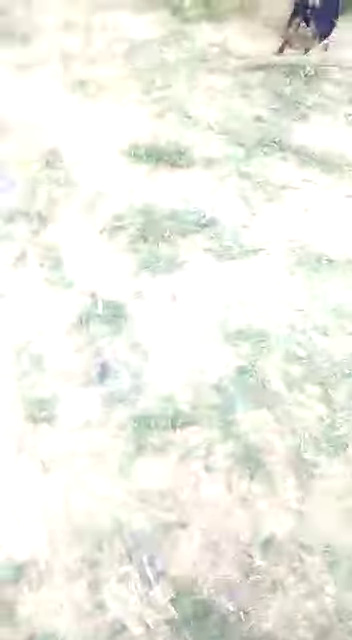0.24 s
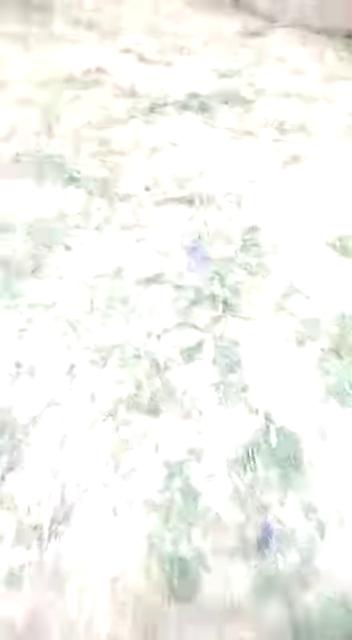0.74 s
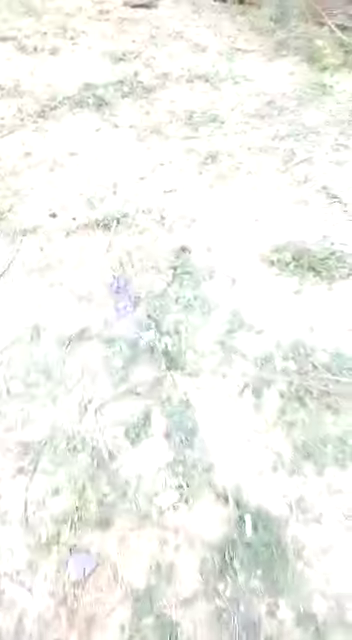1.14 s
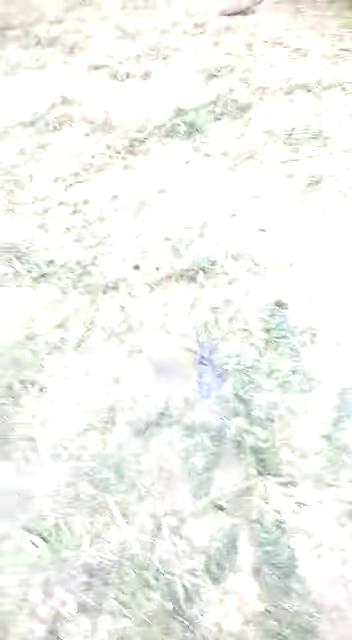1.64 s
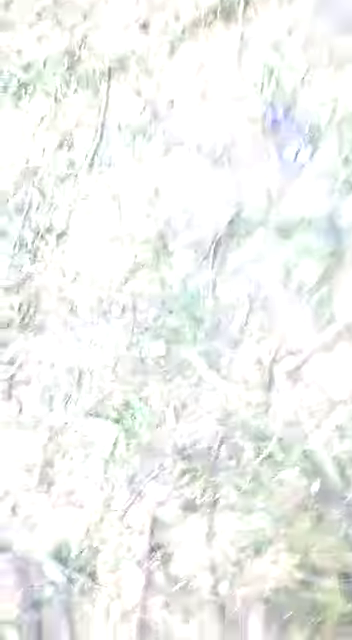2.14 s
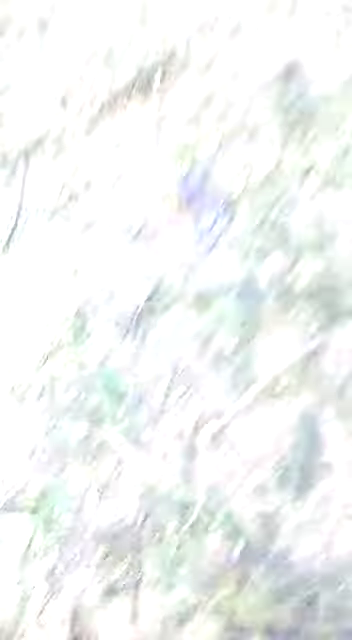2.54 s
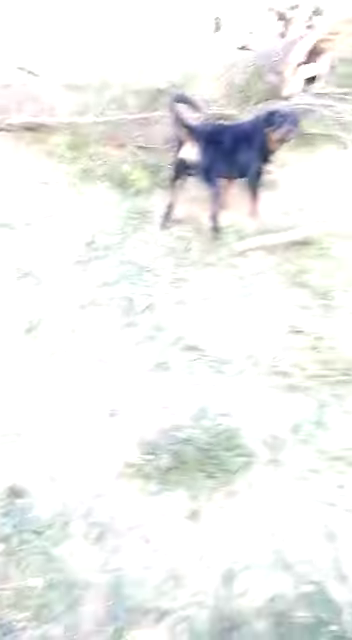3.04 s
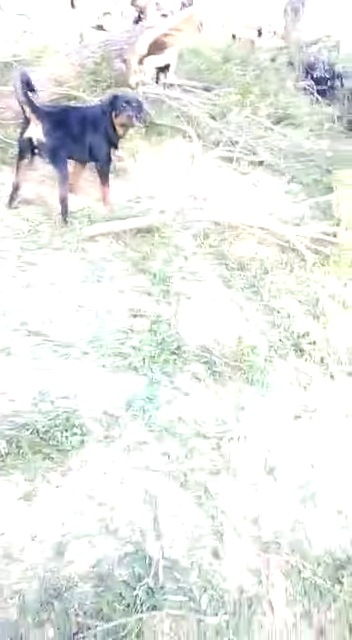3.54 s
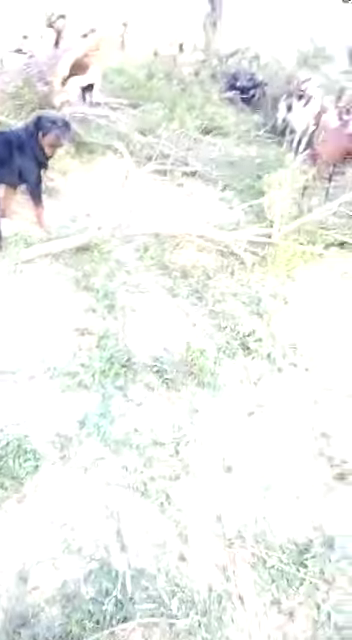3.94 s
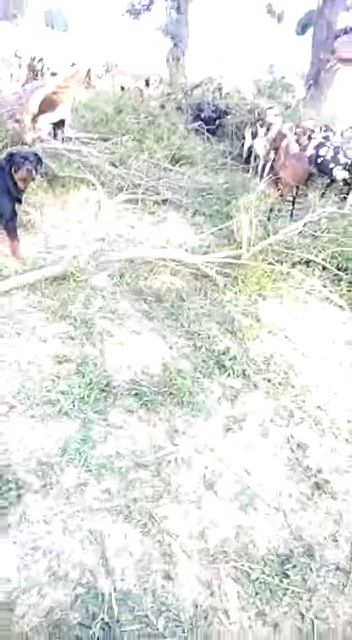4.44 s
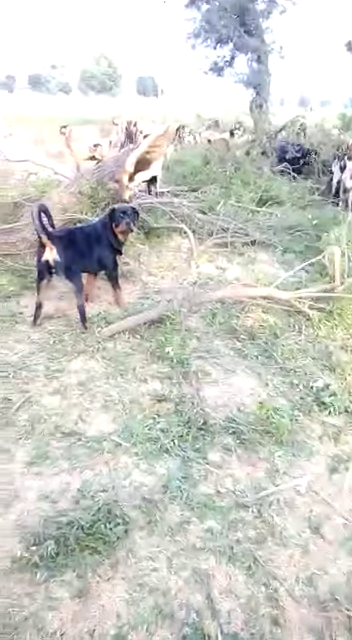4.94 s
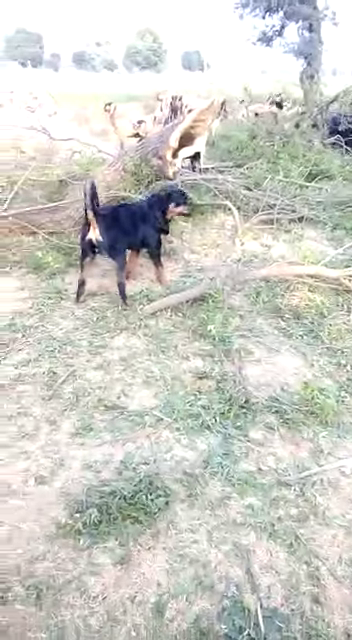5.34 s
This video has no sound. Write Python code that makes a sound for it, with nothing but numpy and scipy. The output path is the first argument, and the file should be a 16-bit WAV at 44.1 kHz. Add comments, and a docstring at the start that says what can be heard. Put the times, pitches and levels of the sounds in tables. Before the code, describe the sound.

Dry brush rustles and twigs snap while a small herd bell clanks quickly, tiny bells tinkle, birds chirp, and bumps knock the handheld microphone.

```python
"""A hand-held camera with two sound ports in a field among a browsing herd, heard in order of time.
From the start brush rustles (patchy noise), wind buffets, small bells ping amid ticks and rattles, and far bells
blend into an unsteady hum (sines). Then twigs snap and feet thud (noise bursts), wind and fingers bump the camera,
mostly on the left port (low pulses), birds whistle and chirp (gliding partials with echoes), the near bell clanks
(decaying modes). Late on, a faint far drone (a sine) grows and fades; a dull flutter (noise) comes and goes, rising at the end."""
import sys
import numpy as np
from scipy import signal
from scipy.fft import rfft, irfft, next_fast_len
from scipy.io import wavfile
from scipy.ndimage import uniform_filter1d, map_coordinates

SR = 44100
rng = np.random.default_rng(int(sys.argv[2]) if len(sys.argv) > 2 else 0)


def pcm_store(signal):
    """Save signal as 16-bit PCM."""
    levels = np.round(np.clip(np.atleast_2d(signal), -1, 1) * 32767)
    wavfile.write(sys.argv[1], SR, levels.astype(np.int16).T)


N = 246078
T = np.arange(N) / SR
LAG = 11  # samples by which the herd reaches the left port later


def amp(db):
    """Decibel law: the amplitude ratio of a level in dB."""
    return np.exp(np.asarray(db) * (np.log(10) / 20))


def unit(x):
    """Power normalisation: the signal scaled to rms 1."""
    return x / np.sqrt(np.mean(x ** 2) + 1e-20)


def sides(pan_db):
    """Level difference between ports: left and right gains, where positive dB means louder on the left."""
    left = 1 / (1 + amp(-np.asarray(pan_db)))
    return 2 * np.array([left, 1 - left])


def curves(rows):
    """Linear interpolation: one value per sample for each column after the time."""
    s, *columns = np.transpose(rows)
    return [np.interp(T, s, column) for column in columns]


def wobble(rate):
    """Band-limited random modulation: a smooth curve through `rate` random knots a second."""
    knots = rng.standard_normal(int(N * rate / SR) + 4)
    return map_coordinates(knots, [T * rate])


def coloured(x, points):
    """Linear filtering: x shaped by a spectrum of (Hz, dB) points, then set to rms 1."""
    n = x.shape[-1]
    m = next_fast_len(n + 4096)
    hz, db = np.transpose(points)
    log_hz = np.log(np.fft.rfftfreq(m, 1 / SR) + 1)
    gain = amp(np.interp(log_hz, np.log(hz + 1), db, -120, -120))
    return unit(irfft(rfft(x, m) * gain, m)[..., :n])


def add(out, s, x, pan_db, lag=0):
    """Superposition: adds one sound at its time and side, reaching the left port `lag` samples later."""
    for ch, (gain, late) in enumerate(zip(sides(pan_db), (lag, 0))):
        part = out[ch, round(s * SR) + late:][:len(x)]
        part += gain * x[:len(part)]


def rush(spectrum, alike, patchy_db, grain_db):
    """Partly coherent stereo noise: grainy in time and patchy in frequency, with dips deeper than peaks."""
    shared = rng.standard_normal(N + 64)
    own = rng.standard_normal((2, N))
    shared_at_ports = np.array([shared[64 - LAG:][:N], shared[64:]])
    noise = np.sqrt(alike) * shared_at_ports + np.sqrt(1 - alike) * own
    grains = amp(grain_db * wobble(300))
    z = signal.stft(grains * noise, nperseg=512)[2]
    # one field of patches for both ports, smooth over 3 frequency bins and 16 time frames
    field = rng.standard_normal(z.shape[1:])
    field = unit(uniform_filter1d(uniform_filter1d(field, size=3, axis=0), size=16, axis=1))
    patches = np.where(field < 0, field, np.tanh(field))
    patchy = signal.istft(z * amp(patchy_db * patches), nperseg=512)[1][:, :N]
    return coloured(patchy, spectrum)


SWELL_DB = 10.5  # how far a swish or gust has dropped at its two ends


def swells(s, length, gain):
    """Addition of powers: events that swell and die around their loudest moment, one curve per row of gain."""
    t = T[::64]
    from_peak = np.abs(2 * (t - s[:, None]) / length[:, None])
    shape = amp(-SWELL_DB * from_peak ** 1.6)
    return np.array([np.interp(T, t, power) for power in gain ** 2 @ shape ** 2])


# steady rustling of the brush: time_s, rustle_db, crisp_treble_db, airy_top_db, dull_scuffing_db
BRUSH_LEVELS = [(0.0, -54.5, -45.5, -60, -58.5), (0.43, -69, -64, -72, -60), (0.87, -60.5, -57, -69, -73.5),
                (1.29, -76, -48, -45, -83), (1.82, -51.5, -68, -66, -63.5), (2.11, -49, -56.5, -56, -57),
                (2.42, -55, -52, -62, -73.5), (2.84, -55.5, -57, -67, -63), (3.12, -75, -65.5, -69, -80.5),
                (3.56, -58.5, -46, -60, -95), (3.85, -52.5, -66.5, -82.5, -85.5),
                (4.49, -63, -58, -96, -82), (5.35, -64, -61.5, -77, -87), (5.58, -45.5, -50, -65, -54)]
# swishes through the brush: loudest_s, length_s, rustle_db, crisp_db, airy_db, scuffing_db
BRUSH_SWISHES = [(0.337, 0.086, -57, -62, -59, -60.5), (0.53, 0.3, -54.5, -81, -84, -66),
                 (0.701, 0.037, -59, -47.5, -48.5, -86), (1.034, 0.19, -54.5, -54, -68, -56.5),
                 (1.11, 0.076, -70, -53, -50, -55.5), (1.262, 0.27, -43.5, -38.5, -59, -50.5),
                 (1.487, 0.14, -49.5, -49.5, -53, -58), (1.609, 0.15, -48, -42.5, -47.5, -57),
                 (2.014, 0.2, -51, -47.5, -56, -57), (2.21, 0.13, -48.5, -69, -60, -65),
                 (2.55, 0.2, -57.5, -49, -55.5, -91), (2.845, 0.098, -57.5, -52.5, -64.5, -71),
                 (3.033, 0.092, -62, -52.5, -54, -69.5), (3.234, 0.34, -51.5, -57.5, -69, -91),
                 (3.432, 0.14, -54, -51, -59, -59), (3.598, 0.19, -62, -52, -62, -74.5),
                 (3.997, 0.11, -48, -51, -87, -86), (4.229, 0.11, -45, -43.5, -79, -76),
                 (4.35, 0.28, -50.5, -61, -60, -89), (4.685, 0.2, -70, -59.5, -75, -75),
                 (4.936, 0.054, -48.5, -56, -79, -65), (4.99, 0.18, -46.5, -51, -77, -69),
                 (5.492, 0.071, -48.5, -69, -72, -75), (5.088, 0.14, -49.5, -50, -77, -60.5),
                 (0.85, 0.078, -70, -58, -70, -62), (1.867, 0.16, -61, -71, -68, -80),
                 (2.327, .08, -67, -61, -53, -63), (2.63, 0.092, -49, -58, -69, -60.5),
                 (3.742, 0.24, -48, -72.5, -69, -88), (4.852, 0.21, -73, -50, -80, -92),
                 (5.359, 0.045, -62, -48, -57, -92), (5.53, 0.08, -39, -42.5, -55, -49.5)]
# where the rustling is: time_s, left_right_db
BRUSH_PAN = [(0, -1), (.37, 1), (.5, -4), (1.3, 0), (2.2, 3), (2.83, 3), (2.95, 2.5), (3.2, 4), (3.8, 0.5),
             (4.4, 3), (5.4, 1), (5.52, 3)]
# relative spectral densities of the four bands: frequency_hz, density_db (per Hz)
RUSTLE_SPECTRUM = [(820, -56), (1400, -55), (1570, -5.5), (1730, -1), (1970, -0.5), (3470, 5.5), (5100, 0),
                   (6680, -7), (7000, -26), (9100, -52), (15400, -120)]
CRISP_SPECTRUM = [(3530, -15.5), (6000, -10.5), (6720, -8.5), (8030, -4.5), (8520, 0), (9140, -1),
                  (9960, 1), (11800, -4), (12500, -2.5), (16200, -44), (22000, -120)]
AIRY_SPECTRUM = [(10500, -27), (12000, -11.5), (13500, -7), (15000, -5), (16000, -38.5)]
SCUFF_SPECTRUM = [(180, -13), (300, 0), (386, -2), (690, -3), (882, -4.5), (1130, -5.5), (1600, -9.5),
                  (2080, -49), (3520, -120)]
AIRY_PAN_DB, SCUFF_PAN_DB = 2.5, 4.5  # the airy top lies further left; the scuffing stays put


def brush():
    """Friction noise: leaves, twigs and grass under hooves and feet give many tiny snaps, summed in four bands."""
    s, length, *peak_db = np.transpose(BRUSH_SWISHES)
    level = np.sqrt(amp(curves(BRUSH_LEVELS)) ** 2 + swells(s, length, amp(peak_db)))
    level = level * amp(2.1 * wobble(22))  # one movement shakes all the bands together
    rustle = level[0] * rush(RUSTLE_SPECTRUM, alike=0.19, patchy_db=9, grain_db=2)
    crisp = level[1] * rush(CRISP_SPECTRUM, alike=0.1, patchy_db=8, grain_db=2)
    airy = level[2] * rush(AIRY_SPECTRUM, alike=.3, patchy_db=7, grain_db=1.5)
    scuff = level[3] * rush(SCUFF_SPECTRUM, alike=.5, patchy_db=2, grain_db=2.5)
    pan_db, = curves(BRUSH_PAN)
    moving = sides(pan_db) * (rustle + crisp) + sides(pan_db + AIRY_PAN_DB) * airy
    return moving + sides([SCUFF_PAN_DB]) * scuff


# wind in the lulls between gusts: time_s, level_db
WIND_LULLS = [(0, -65), (.55, -76.5), (1.2, -89), (2.7, -72), (3.2, -93.5), (4.0, -81.5), (4.7, -78.5),
              (5.58, -87)]
# gusts on the ports: strongest_s, length_s, level_db, left_right_db
WIND_GUSTS = [(0.058, 0.034, -51, -14), (0.288, 0.27, -63.5, 17), (0.81, 0.12, -53.5, 36),
              (0.916, 0.043, -42, 47), (1.012, 0.083, -50.5, 13), (1.199, 0.2, -47.5, 9),
              (1.329, 0.098, -46.5, 10), (1.486, 0.17, -56.5, 32), (1.747, 0.23, -59.5, 38),
              (2.062, 0.16, -55.5, 19), (2.206, 0.17, -56.5, -4), (2.39, 0.17, -66, 22),
              (2.656, 0.11, -52, -5.5), (2.736, 0.18, -65, 17), (2.964, 0.21, -67, 23),
              (3.454, 0.19, -60.5, -1.5), (4.114, 0.16, -71.5, 19.5), (5.083, 0.38, -67, 0),
              (5.494, 0.097, -63, -26)]
# relative spectral density of the buffeting: frequency_hz, density_db (per Hz)
BUFFET_SPECTRUM = [(15, -61), (25, -18), (54, -6), (88, 1), (156, 6), (217, 1.5), (383, -24), (520, -6),
                   (680, -12), (1140, -120)]


def wind():
    """Turbulent pressure: lumpy low noise, only partly coherent between the two ports."""
    s, length, db, pan_db = np.transpose(WIND_GUSTS)
    level = np.sqrt(amp(curves(WIND_LULLS)) ** 2 + swells(s, length, amp(db) * sides(pan_db)))
    lumps = amp(3 * np.array([wobble(22), wobble(22)]))
    buffeting = rush(BUFFET_SPECTRUM, alike=.3, patchy_db=.8, grain_db=.1)
    return level * unit(lumps * buffeting)


def ring(hz, t60, t):
    """Modal decay: one struck mode drops fast, then leaves a faint long tail, wavering throughout."""
    sway = np.interp(t, np.arange(60) / 110, rng.standard_normal(60))
    drift = np.interp(t, np.arange(60) / 90, rng.standard_normal(60))
    first_drop = amp(-60 * t / max(t60, .01))
    tail = amp(-23.5 - 60 * t / max(5.2 * t60, .01))
    rise = (1 - np.exp(-t * hz / 4.5)) ** 2
    level = (first_drop + tail) * rise * amp(2.5 * sway)
    return level * np.sin(2 * np.pi * hz * t + 0.76 * drift)


# small bells, ticks and a rattle, each with its ringing pitches: pitch_hz, level_db (relative to the event)
PING_MODES = [
    [(3480, -2.5), (8720, 3)],
    [(2965, 0)],
    [(3300, 0)],
    [(4070, 0)],
    [(4213, 0)],
    [(5480, 0)],
    [(8000, 0)],
    [(8228, 0)],
    [(9944, 0)],
    [(11348, 0)],
    [(11970, 0)],
    [(10950, 0)],
    [(7800, 0)],
    [(3600, 0), (4150, -6)],
    [(3280, 0), (2850, -5)],
    [(3490, 0)],
    [(3090, 0)],
    [(4440, 0)],
]
# for each of them: t60_s of the first drop, then its pings, ticks or clicks: start_s, level_db, left_right_db
PING_EVENTS = [ (0.067, [(0.019, -45, 8), (1.066, -41, -7), (0.102, -47.5, 0), (2.897, -50, -5),
               (3.124, -42, -6), (3.281, -42.5, 3), (4.744, -44, -3)]), (0.23, [(0.478, -50.5, 5),
               (1.083, -42, 7), (1.4, -46, 6), (1.452, -47.5, 1), (1.749, -43, 4), (4.992, -46, 3),
               (3.488, -50.5, 0), (4.116, -54, 6), (4.89, -51, 6), (5.142, -53.5, 11), (5.417, -50, 5)]),
               (0.17, [(0.897, -47.5, -3), (2.709, -64, 8), (3.522, -46, -2), (3.657, -47, 5)]),
               (0.046, [(0.492, -41, 8), (1.127, -42, 12), (1.232, -32.5, 26), (1.464, -39, 19),
               (1.669, -36.5, 15), (2.304, -39, -1), (2.433, -41.5, 5), (2.996, -42.5, 7)]),
               (0.18, [(0.657, -53, 5), (2.72, -64, 8), (2.84, -51, 18), (2.885, -49.5, 10), (2.94, -58, 3),
               (3.065, -53, 15), (3.275, -48, 14), (3.86, -50, 6), (4.117, -44.5, 7), (4.455, -53, 5),
               (5.223, -56, -9), (5.26, -73, 4)]), (0.25, [(0.44, -61, -8), (2.891, -39.5, 6.5),
               (3.024, -48, 11), (4.165, -45, 0), (4.6, -55, -7), (4.645, -52, 3), (4.69, -59, -4),
               (4.76, -67, 2), (4.901, -47.5, 1), (5.202, -58, 15)]), (0.55, [(1.815, -47.5, -28),
               (4.608, -46.5, -11)]), (0.65, [(1.494, -59, -23), (3.634, -46.5, -2.5), (4.545, -50, -9)]),
               (0.17, [(1.587, -58, -6), (3.082, -46.5, -16), (3.273, -42, 10), (3.802, -38, -4),
               (3.888, -44.5, -11), (4.3, -39, 32), (4.551, -47, 20)]), (0.35, [(0.0, -57, 17)]),
               (0.072, [(1.494, -37.5, 18)]), (0.11, [(4.645, -44.5, 5), (5.415, -51, 7)]),
               (0.16, [(3.589, -41, -10)]), (0.054, [(2.153, -47, 14), (2.173, -56, 3), (2.215, -41.5, 14),
               (2.262, -42, 3), (2.407, -41.5, 3), (2.553, -61, 3), (2.607, -47.5, 15)]),
               (0.031, [(3.852, -39.5, 2), (3.867, -36, -6.5), (3.882, -46, 5), (3.897, -43, -6),
               (3.925, -42, 2), (3.944, -40, 2), (4.255, -45, 4)]), (0.21, [(2.66, -69, 4), (4.66, -53, 20),
               (4.76, -50, 12)]), (0.26, [(4.42, -51, 4), (4.755, -51, 1), (4.82, -54, 7),
               (4.312, -52, 5)]), (0.13, [(2.65, -51, 4), (2.842, -50, 9), (4.542, -48.5, 8),
               (4.71, -60, 4)]), ]


def pings():
    """Modal synthesis: each ping of a small bell, tick or click of a rattle excites one or two decaying modes."""
    out, t = np.zeros((2, N)), T[:SR // 4]
    for modes, (t60, events) in zip(PING_MODES, PING_EVENTS):
        for s, db, pan_db in events:
            for hz, mode_db in modes:
                add(out, s, amp(db + mode_db) * ring(hz, t60, t), pan_db, LAG)
    return out


# modes of the herd's bells, each detuned at random by up to 3 % when played: pitch_hz
HERD_MODES = [1720, 2970, 3235, 3480, 3914, 4213, 4905, 5481, 7213, 7528, 8000, 8228, 8716, 9944, 11310,
              12700, 13377]
TINKLE_DB = -62  # the faintest of the far bells


def tinkle():
    """Random superposition: 300 faint strikes from the rest of the herd, scattered evenly in time."""
    out, t = np.zeros((2, N)), T[:SR // 5]
    for when, which, size, side in rng.random((300, 4)):
        hz = HERD_MODES[int(which * len(HERD_MODES))] * (.97 + .06 * side)
        strike = amp(TINKLE_DB + 7 * size) * ring(hz, 0.15, t)
        add(out, when * N / SR, strike, 14 * side - 4, LAG)
    return out


# modes of the near bell, lowest first: pitch_hz, level_db (before each blow's change), t60_ratio (to the blow's t60)
BELL_MODES = [(1720, 0, 1), (7213, -25, 2.8), (7528, -26, 2.6), (8228, -23, 2.8), (9944, -21, 3)]
# unsteady hum of many far bells: time_s, level_db
HUM_LEVEL = [(0, -79), (.55, -77), (1.0, -62), (1.85, -66), (2.2, -73), (2.9, -62), (3.25, -65), (3.5, -88),
             (4.03, -66), (4.5, -74), (4.8, -84), (5.15, -69), (5.58, -59)]


def hum():
    """Incoherent blending: many far bells at the near bell's lowest pitch, as one tone unsteady in level and phase."""
    tone = np.sqrt(2) * np.sin(2 * np.pi * BELL_MODES[0][0] * T + 2.1 * wobble(70))
    level = amp(curves(HUM_LEVEL)[0] + 6.8 * wobble(21.97))
    out = np.zeros((2, N))
    add(out, 0, level * tone, -3, LAG)
    return out


# snaps and knocks: start_s, level_db, treble_db (crack relative to knock), t60_s (of the knock)
SNAP_EVENTS = [(0.044, -42, 3, 0.033), (0.106, -49.5, 9, 0.016), (0.204, -47.5, -15, 0.018),
               (0.257, -54, -8, 0.025), (0.343, -48, -1.5, 0.21), (0.351, -53, -12, .03),
               (0.362, -47, -12, 0.056), (0.369, -50.5, 4, .03), (0.721, -49, -6, 0.0066),
               (0.794, -56, -6, 0.029), (0.979, -39.5, 1, 0.02), (1.245, -45.5, 12, 0.045),
               (1.312, -41.5, 14, 0.085), (1.321, -49, 0.5, 0.016), (1.494, -66, 19, .015),
               (1.586, -62, 21, 0.03), (1.637, -67, 23, .015), (1.283, -64, 16, .012),
               (2.047, -57, 25, 0.011), (2.215, -70.5, 11.5, 0.015), (2.261, -67, 8, .012),
               (2.292, -52.5, 24, 0.012), (2.406, -63, 23, 0.022), (2.594, -53.5, 7, 0.33),
               (3.362, -47, 9.5, 0.25), (3.467, -63, 9, .016), (4.717, -84, 26, .011),
               (4.921, -67, -3, 0.43), (4.946, -51, -20, 0.31), (5.062, -50.5, -1, 0.039),
               (5.487, -56, 5, 0.074)]
# where the snaps are: time_s, left_right_db
SNAP_PAN = [(0, 21), (.25, 21), (.35, 30), (1, 9), (1.25, 6), (1.55, 6.5), (2.3, 12), (2.45, 2.5), (3.4, 8),
            (5.5, 6)]
# relative spectra of the two parts: frequency_hz, gain_db
KNOCK_SPECTRUM = [(150, -34), (400, 8.5), (700, 3), (1300, -3), (2500, -15), (5000, -34)]
CRACK_SPECTRUM = [(1500, -4), (3000, 4), (8000, 2), (15000, 8.5)]
SNAP_RISE_S = .0007


def snaps():
    """Impulsive fracture and impact: a sharp break, then noise dying as a dull knock and a briefer bright crack."""
    out, t = np.zeros((2, N)), T[:SR // 4]
    for s, db, treble_db, t60 in SNAP_EVENTS:
        low, high = rng.standard_normal((2, len(t)))
        low[50], high[50] = 22, 4  # the break itself, about 1 ms in
        fall_db = -60 * t / max(t60, .004)
        knock = amp(fall_db) * coloured(low, KNOCK_SPECTRUM)
        crack = amp(treble_db + 1.5 * fall_db) * coloured(high, CRACK_SPECTRUM)
        rise = 1 - np.exp(-t / SNAP_RISE_S)
        add(out, s, amp(db) * rise * (knock + crack), np.interp(s, *np.transpose(SNAP_PAN)), 6)
    return out


# soft low bumps: start_s, peak_db, pitch_hz, left_right_db, length_cycles
BUMP_EVENTS = [(0.142, -48, 175, 6, 4.1), (0.219, -41.5, 205, 4, 4.5), (0.824, -44, 145, 37, 4.2),
               (0.904, -29.5, 193, 51, 2.8), (0.944, -37.5, 150, 49, 6), (1.16, -43.5, 363, 7, 8.1),
               (1.2238, -21.5, 287, 3.5, 1.76), (1.245, -39.5, 213, 1, 2.8), (1.302, -34, 388, -1, 3.8),
               (1.355, -42.5, 139, 27, 2.4), (1.709, -48, 122, 32, 2.3), (2.039, -40.5, 156, 31, 4.5),
               (2.361, -53.5, 187, 30, 5.4), (2.595, -48.5, 274, 3, 4.1), (2.646, -47, 116.5, -25, 4.3),
               (3.357, -39.5, 350, 4, 2.7), (3.359, -42.5, 970, 4, 16), (4.07, -59.5, 114, 26, 6.2),
               (4.666, -56, 255.5, 2, 9.9), (4.909, -58, 146, 3, 3.9), (4.948, -43.5, 462, 5, 11),
               (4.949, -40, 316, 1.5, 13.7), (5.018, -54, 310, 1, 9.2), (5.521, -44, 307, 0, 7.3)]


def bumps():
    """Damped oscillation: each bump is a few low cycles that swell and die."""
    out, t = np.zeros((2, N)), T[:SR // 5]
    for s, db, hz, pan_db, cycles in BUMP_EVENTS:
        u = 3.37 * t * hz / max(cycles, .5)
        envelope = (u * np.exp(1 - u)) ** 2  # peaks at 1 when u = 1
        add(out, s, amp(db) * envelope * np.sin(2 * np.pi * hz * t), pan_db)
    return out


def song(rows, rough_db, jitter, breath):
    """Harmonic synthesis: a call's start and its fluttering partials, smeared by breath and faded at both ends."""
    s, hz, *levels = np.transpose(rows)
    t = np.arange(s[0], s[-1], 1 / SR)
    since = t - s[0]
    shaky = 1 + jitter * np.interp(since, np.arange(60) / 250, rng.standard_normal(60))
    pitch = uniform_filter1d(np.interp(t, s, hz), size=300, mode='nearest') * shaky
    phase = 2 * np.pi * np.cumsum(pitch) / SR
    tone = np.zeros(len(t))
    for k, db in enumerate(levels, start=1):
        roughness = np.interp(since, np.arange(40) / 160, rng.standard_normal(40)) - .5
        tone += amp(np.interp(t, s, db) + rough_db * roughness) * np.sin(k * phase)
    air = unit(np.convolve(rng.standard_normal(len(t)), np.hanning(160), 'same'))
    tone = tone * (np.sqrt(1 - breath) + np.sqrt(breath) * air)
    fade = np.clip(np.minimum(since, s[-1] - t) / .002, 0, 1)
    return s[0], np.sqrt(2) * tone * fade


WARBLE_PER_S, FADE_DB = 51, 10
DIVE = .25  # share of a glide left for its very end
GROWS_DB = 14  # a glide starts this much softer for each octave between its two ends


def whistle(s, length, from_hz, to_hz, warble_hz, db):
    """Frequency modulation: a glide with a warble, as rows of start_s, pitch_hz, level_db."""
    u = np.linspace(0, 1, num=30)
    glide = (1 - DIVE) * u + DIVE * u ** 6
    warble = warble_hz * np.cos(2 * np.pi * WARBLE_PER_S * length * u)
    hz = from_hz + glide * (to_hz - from_hz) + warble
    growth_db = GROWS_DB * (1 - glide) * abs(np.log2(from_hz / to_hz))
    level_db = db - FADE_DB * (2 * u - 1) ** 6 - growth_db
    return np.transpose([s + length * u, hz, level_db])


RISE = .78  # share of the pitch rise done early
# two stations of the fall in pitch: time_share, pitch_change_share
FALL_STATIONS = [(.25, .22), (.57, .76)]
# a row for each of three partials, a column for each of six stations: level_db (relative to the call)
PARTIAL_LEVELS = [
    [-14, -3, -1, -1, -2, -6],
    [-7, -3, 0, -1, 0, -3],
    [-22, -2, -2, -8, -14, -18],
]
THROAT_HZ, DROP_DB_PER_KHZ = 4900, 40  # partials above it fade


def chirp(start, top, end, start_hz, top_hz, end_hz, early, *db):
    """Source and filter: six stations of a reedy call, as rows of time_s, pitch_hz, level_db of each partial."""
    part = lambda a, b, u: a + u * (b - a)
    fall_s = [part(top, end, u) for u, _ in FALL_STATIONS]
    fall_hz = [part(top_hz, end_hz, v) for _, v in FALL_STATIONS]
    s = [start, part(start, top, early), top, *fall_s, end]
    hz = [start_hz, part(start_hz, top_hz, RISE), top_hz, *fall_hz, end_hz]
    over_khz = np.clip(np.outer([1, 2, 3], hz) - THROAT_HZ, 0, None) / 1000
    levels = np.array(db)[:, None] + PARTIAL_LEVELS - DROP_DB_PER_KHZ * over_khz
    return np.transpose([s, hz, *levels])


# pure whistles: start_s, length_s, from_hz, to_hz, warble_depth_hz, level_db
BIRD_WHISTLES = [(.29, .07, 14800, 12900, 0, -64), (3.703, .04, 5500, 4850, 0, -51),
                 (3.735, .025, 4500, 3900, 0, -48), (3.632, .085, 3400, 3350, 120, -53),
                 (4.97, .038, 3930, 3930, 70, -44), (5.024, .036, 4000, 3820, 70, -44),
                 (5.062, .073, 5780, 3600, 0, -46), (5.331, .059, 4080, 4020, 160, -46),
                 (5.391, .015, 4050, 4500, 150, -45), (5.41, .022, 4500, 3950, 120, -47),
                 (2.485, .1, 3230, 3260, 0, -55), (2.65, .115, 3180, 3400, 0, -53),
                 (3.13, .07, 3350, 3800, 0, -56), (3.2, .055, 3800, 3050, 0, -55),
                 (5.005, .02, 4200, 4250, 0, -53)]
# reedy chirps: start_s, top_s, end_s, start_hz, top_hz, end_hz,
# early_share (of the rise time, after which most of the rise is done), first_db, second_db, third_db (partials)
BIRD_CHIRPS = [(.402, .535, .575, 1300, 1800, 1540, .7, -60, -55, -55),
               (3.6, 3.652, 3.74, 1900, 2460, 1990, .45, -53, -51, -54),
               (3.905, 3.92, 4.015, 2650, 2700, 1730, .5, -52, -50, -55),
               (4.166, 4.182, 4.245, 2100, 2660, 1900, .45, -51, -50, -54)]


def birds():
    """Convolution with diffuse echoes: calls from the trees, smeared by trunks and leaves."""
    out = np.zeros((2, N))
    for call in BIRD_WHISTLES:
        add(out, *song(whistle(*call), rough_db=1.8, jitter=.008, breath=.02), 2)
    for call in BIRD_CHIRPS:
        add(out, *song(chirp(*call), rough_db=3.5, jitter=.011, breath=.07), 2)
    echo = rng.standard_normal((2, SR // 4)) * amp(-60 * T[:SR // 4] / 0.16)  # t60 0.16 s
    echo = amp(-8) * echo / np.linalg.norm(echo[0])
    return out + signal.fftconvolve(out, echo, axes=1)[:, :N]


# blows of the near bell's clapper: start_s, level_db, upper_modes_db (raised by), t60_s (lowest mode's first drop)
CLAPPER_BLOWS = [(0.615, -31, -8, 0.049), (0.7018, -30.5, -9, 0.032), (0.845, -25.5, -5, 0.043),
                 (0.904, -26, -1, 0.044), (1.0223, -38.5, 5, 0.064), (1.3428, -33.5, 10.5, 0.045),
                 (1.523, -24, -1.5, 0.029), (1.603, -28, 11, 0.063), (1.757, -27, 3.5, 0.058),
                 (1.815, -41, 7.5, 0.24), (2, -33, 4, 0.046), (2.1048, -41, 10, 0.14),
                 (2.2003, -38.5, 6, 0.12), (2.3511, -26.5, 4, 0.051), (2.5694, -32, 3, 0.061),
                 (2.7235, -32, 0, 0.093), (2.7438, -27, 2, 0.046), (2.864, -47.5, 13, 0.098),
                 (2.9766, -29.5, -11, 0.039), (3.1904, -52.5, 0, 0.069), (3.2792, -34, 5, 0.07),
                 (3.7187, -32, 3.5, 0.049), (3.804, -38, 0.5, 0.058), (3.8904, -42.5, -7, 0.058),
                 (3.985, -42, 0, 0.13), (4.0705, -39, -21, 0.05), (4.2343, -37.5, 5, 0.064),
                 (4.2996, -43, 0, 0.067), (4.365, -34.5, -1.5, 0.072), (4.437, -44, -3, 0.046),
                 (4.4775, -50.5, -11, 0.12), (4.566, -53, 17, 0.11), (4.625, -59, 2, 0.072),
                 (4.715, -61, 20, 0.072), (4.78, -74, -4, 0.044), (4.8956, -51, 13, 0.096),
                 (5.03, -40, -5, 0.047), (5.122, -41, -3, 0.048), (5.186, -57, -9, 0.079),
                 (5.2584, -40.5, 7, 0.05), (5.31, -60, 6, 0.14), (5.3609, -37.5, -1, 0.069),
                 (5.429, -57, 2, 0.12), (5.5002, -37.5, 11, 0.089)]
# the bell turns and the camera swings: time_s, left_right_db
BELL_PAN = [(.6, -2.5), (.85, -4), (1.3, -12), (1.8, 5.5), (2.1, -2), (2.35, 8), (2.57, -10.5), (2.75, 7),
            (3.3, 7), (3.6, -27), (4.4, -44), (4.6, -8), (5.5, -19)]


def clanks():
    """Modal excitation: each clapper blow rings all modes of the near bell, the upper ones in varying balance."""
    out, t = np.zeros((2, N)), T[:SR // 4]
    for s, db, upper_db, t60 in CLAPPER_BLOWS:
        scatter = rng.normal(0, 2.7, len(BELL_MODES) - 1)
        balance = np.r_[0, upper_db + scatter]
        clank = np.zeros(len(t))
        for (hz, mode_db, ratio), change_db in zip(BELL_MODES, balance):
            clank += amp(mode_db + change_db) * ring(hz, t60 * ratio, t)
        add(out, s, amp(db) * clank, np.interp(s, *np.transpose(BELL_PAN)), LAG)
    return out


# a far low drone: time_s, level_db
DRONE_LEVEL = [(0, -90), (3.4, -98), (4.1, -77.5), (4.7, -76), (5.3, -79), (5.58, -94)]
DRONE_HZ = 85


def drone():
    """Long wavelength: a low hum from far away, wavering a little, is the same at both ports."""
    phase = 2 * np.pi * DRONE_HZ * T + 0.74 * wobble(5.7)
    level = amp(curves(DRONE_LEVEL)[0] + 1.6 * wobble(8.7))
    return level * np.sqrt(2) * np.sin(phase)


# a faint flutter from far off: time_s, level_db
FLUTTER_LEVEL = [(0, -100.5), (3.85, -101.5), (3.96, -81), (4.1, -85.5), (4.25, -67), (4.34, -77),
                 (4.4, -70), (4.7, -74.5), (4.8, -100), (5.58, -65.5)]
# its relative spectral density: frequency_hz, density_db (per Hz)
DULL_SPECTRUM = [(300, -49), (480, -5), (650, 0), (850, 4), (1100, -28), (1500, -53.5)]


def flutter():
    """Amplitude-modulated band noise: faint, patchy and dull, from far across the field."""
    level = amp(curves(FLUTTER_LEVEL)[0] + 3 * wobble(25))
    return level * sides([6]) * rush(DULL_SPECTRUM, alike=.5, patchy_db=3.5, grain_db=3)


def scene():
    """Linear superposition: everything that reaches the two ports."""
    ringing = pings() + tinkle() + hum() + clanks()
    return brush() + wind() + ringing + snaps() + bumps() + birds() + drone() + flutter()


TOP_HZ = 15850  # the camera's band limit


def record(dry):
    """Band limiting: the camera cuts the deep bass and keeps nothing above its band limit."""
    m = next_fast_len(N + 4096)
    hz = np.fft.rfftfreq(m, 1 / SR)
    bass_cut = hz ** 2 / (hz ** 2 + 45 ** 2)
    return irfft(rfft(dry, m) * bass_cut * (hz < TOP_HZ), m)[:, :N]


dry = scene()
out = record(dry)
pcm_store(out)
```